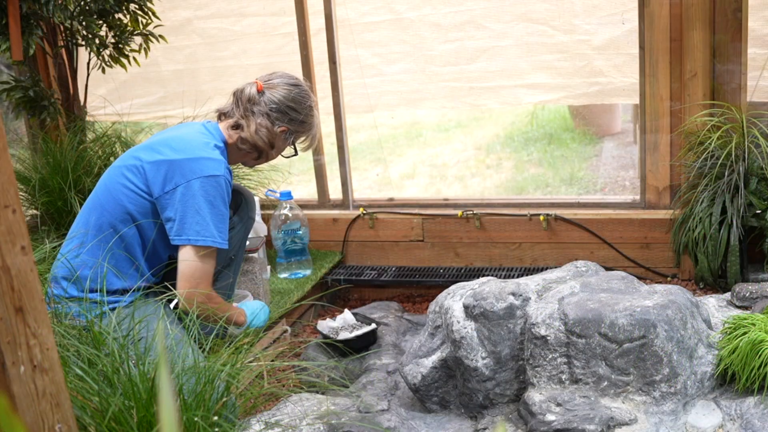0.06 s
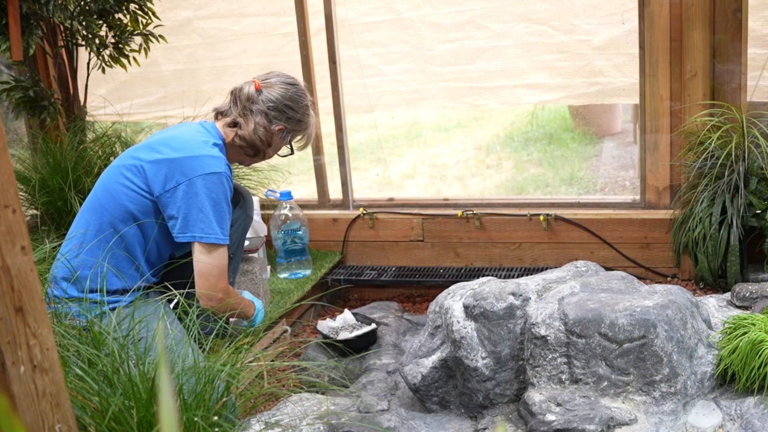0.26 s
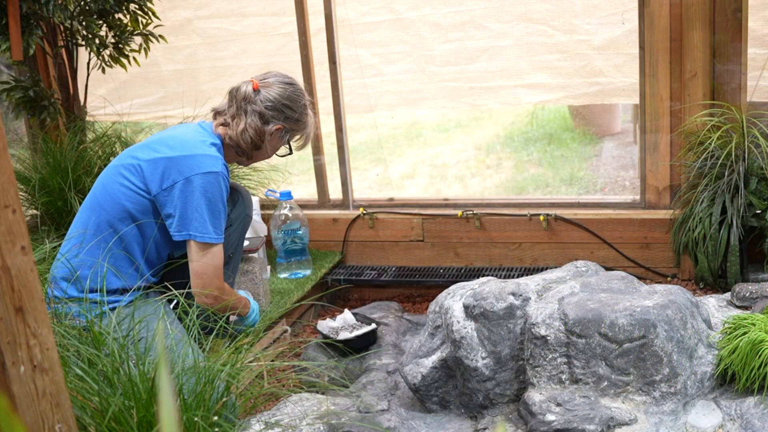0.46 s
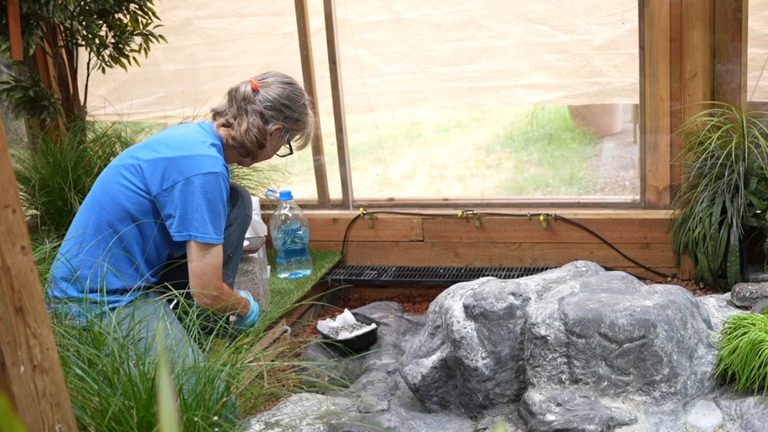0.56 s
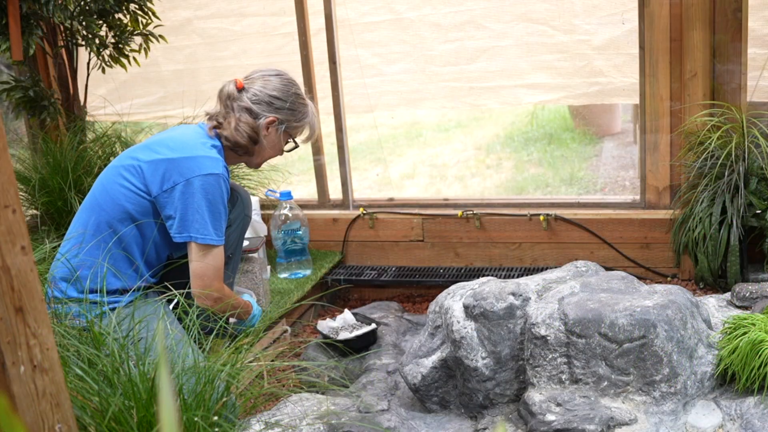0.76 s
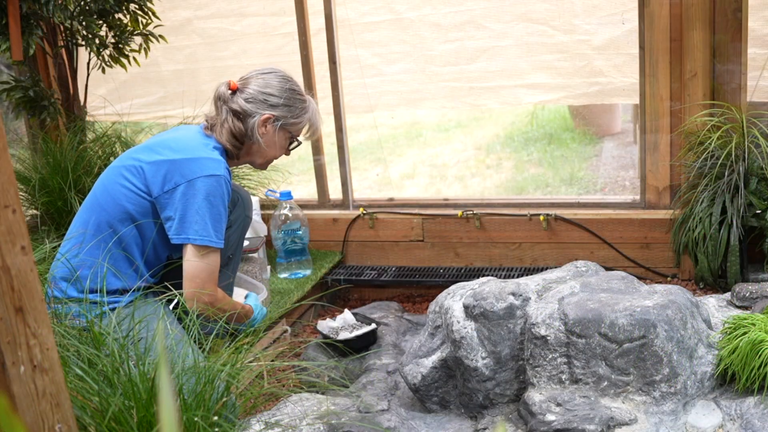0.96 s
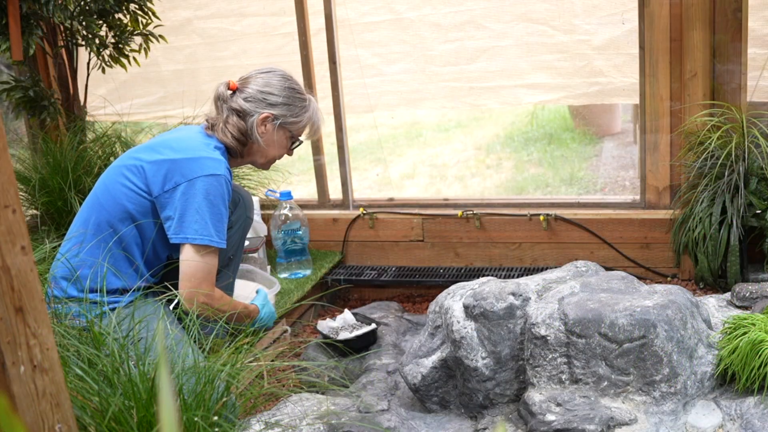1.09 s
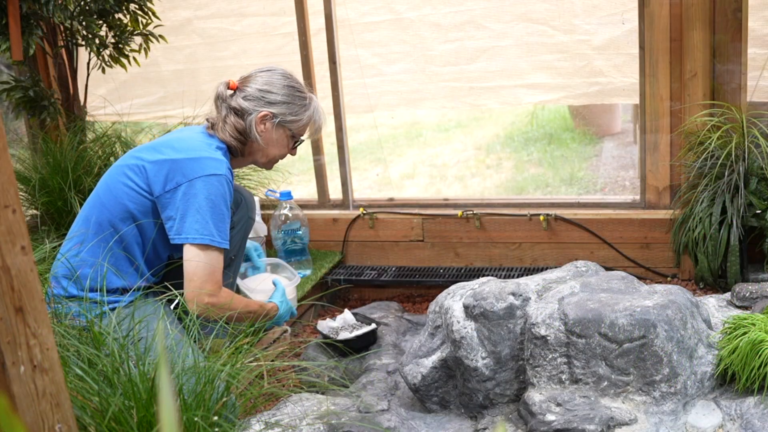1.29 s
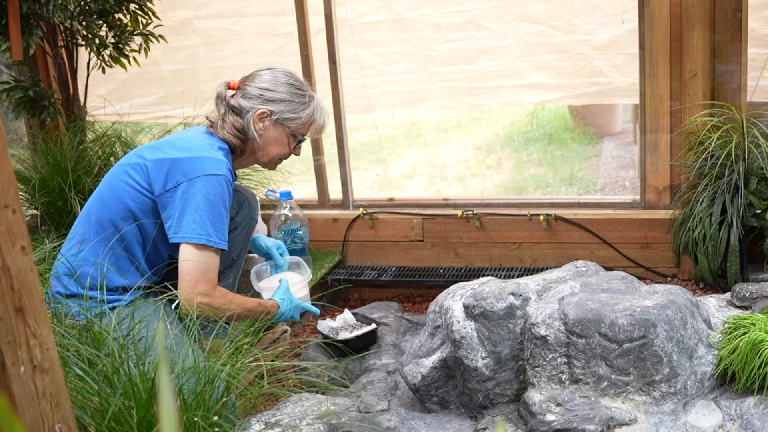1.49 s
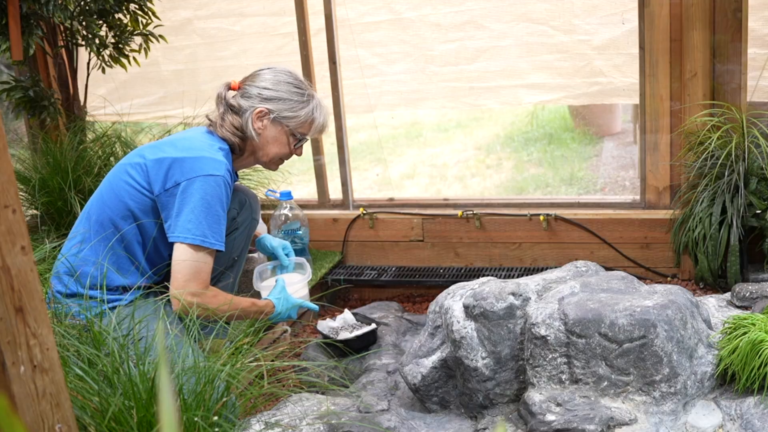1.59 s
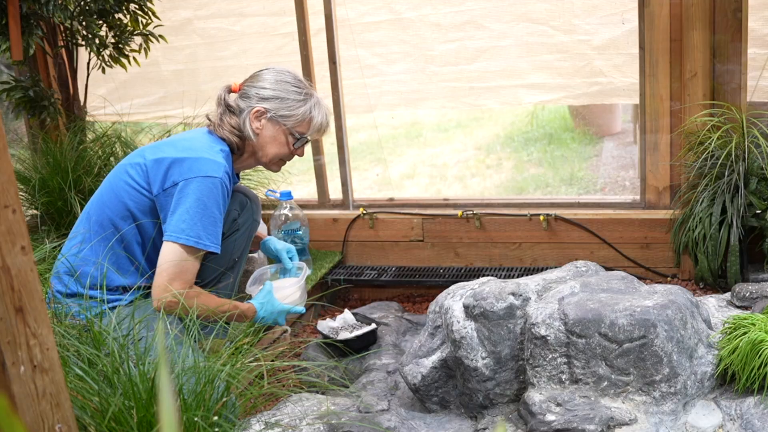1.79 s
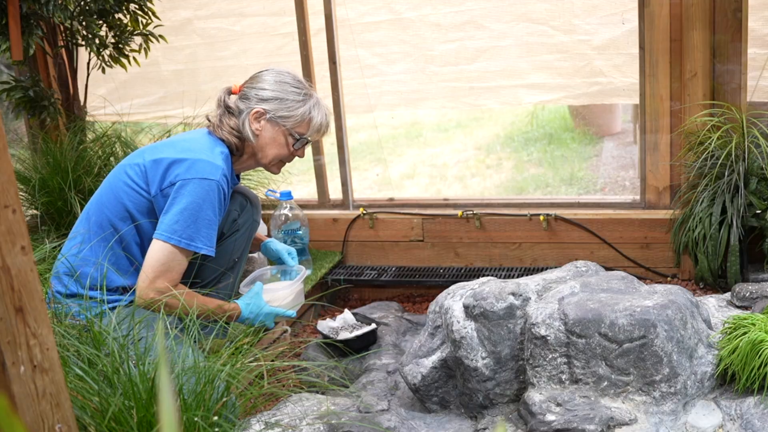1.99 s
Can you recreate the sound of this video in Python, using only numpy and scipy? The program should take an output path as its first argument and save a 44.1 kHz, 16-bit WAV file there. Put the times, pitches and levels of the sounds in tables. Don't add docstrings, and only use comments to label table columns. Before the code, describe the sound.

Small finches give three quick high whistled chirps, then one later, mostly as room echo; a plastic tub thuds and drags, followed by soft seed and glove rustle over a faint fan hum, in distant stereo.

```python
import sys
import numpy as np
from scipy import signal
from scipy.fft import rfft, irfft, next_fast_len
from scipy.io import wavfile
from scipy.ndimage import uniform_filter1d, map_coordinates

SR = 44100
rng = np.random.default_rng(int(sys.argv[2]) if len(sys.argv) > 2 else 0)


def field_ratio(decibels):
    return 10 ** (np.asarray(decibels, dtype=float) / 20)


def store_pcm(level_fs):
    pcm = np.round(np.clip(level_fs, -1, 1) * 32767).astype(np.int16)
    wavfile.write(sys.argv[1], SR, np.atleast_2d(pcm).T)


N = 90404
T = np.arange(N) / SR


def unit(x):
    return x / np.sqrt(np.mean(x ** 2) + 1e-20)


def along(points, hz):
    f, value = np.transpose(points)
    return np.interp(np.log(hz + 1), np.log(f + 1), value)


def wobble(rate):
    knots = rng.standard_normal(int(N * rate / SR) + 4)
    return map_coordinates(knots, [T * rate])


def filtered(x, response):
    size = next_fast_len(N + SR // 2)
    spectrum = rfft(x, size) * response(np.fft.rfftfreq(size, 1 / SR))
    return irfft(spectrum, size)[..., :N]


def rush(gain):
    # frequency in Hz, left-right likeness (1 = mono).
    likeness = [(60, .97), (180, .92), (400, .9), (750, .72), (1400, .45), (2800, .05), (15000, .05)]

    def mid_side(hz):
        angle = np.arccos(np.clip(along(likeness, hz), -1, 1)) / 2
        return gain(hz) * np.array([np.cos(angle), np.sin(angle)])

    mid, side = filtered(rng.standard_normal((2, N)), mid_side)
    return unit(np.array([mid + side, mid - side]))


def narrow(hz, width):
    return lambda f: 1 / (1 + ((f - hz) / width * 2) ** 2)


def bell(hz, octaves):
    return lambda f: np.exp(-(np.log2((f + 1) / hz) / octaves) ** 2 / 2)


def burst(start, rise, t60):
    age = np.maximum(T - start, 0)
    return (1 - np.exp(-age / rise)) * field_ratio(-60 * age / t60)


def swell(peak, rise, t60):
    before = np.exp(-((T - peak) / rise) ** 2 / 2)
    after = field_ratio(-60 * np.maximum(T - peak, 0) / t60)
    return np.where(T < peak, before, after)


def glide(rows):
    s, hz, db = np.transpose(rows)
    pitch = uniform_filter1d(np.interp(T, s, hz), size=133)
    sounding = (T > s[0]) * (T < s[-1])
    gain = uniform_filter1d(field_ratio(np.interp(T, s, db)) * sounding, size=67)
    return 2 * np.pi * np.cumsum(pitch) / SR, gain


def finches():
    # time in seconds, pitch in Hz, level in dB.
    chirps = [
        [(.187, 6300, -57), (.192, 6840, -47.5), (.201, 6954, -28), (.204, 6070, -38.5), (.208, 4260, -54)],
        [(.26, 5530, -66), (.272, 6185, -32.5), (.287, 6272, -37), (.298, 6600, -36), (.322, 6640, -32.5),
         (.335, 6130, -33.5), (.346, 4770, -59.5)],
        [(.452, 5070, -53), (.462, 5540, -36), (.472, 5740, -37.5), (.492, 6510, -30.5), (.508, 6570, -30.5),
         (.524, 6523, -34), (.532, 5920, -37), (.542, 5170, -55)],
        [(1.737, 7020, -54), (1.746, 6560, -38), (1.76, 6820, -41.5), (1.79, 7060, -33), (1.815, 7076, -41.5),
         (1.83, 6560, -34), (1.853, 5820, -50.5)],
    ]
    # octave overtone in dB, direct left over right in dB, direct level in dB.
    perches = [(-30, -9, -1.5), (-30.5, -8.5, 3), (-27.5, -13, -1.5), (-16, -11.5, -6.5)]
    out = np.zeros((2, N))
    for rows, (octave_db, pan_db, direct_db) in zip(chirps, perches):
        phase, gain = glide(rows)
        overtone = field_ratio(octave_db) * gain / gain.max() * np.sin(2 * phase)
        song = gain * (np.sin(phase) + overtone)
        sides_db = direct_db + np.array([[pan_db / 2], [-pan_db / 2]])
        out += field_ratio(sides_db) * song + field_ratio(9) * room(song)
    return out


def room(x):
    # frequency in Hz, reverberation time t60 in seconds.
    decay = [(200, 0.62), (2000, 0.9), (6500, 0.31), (14000, 0.19)]
    build_s, early_db, early_s = 0.0041, -5, 0.0083
    hz, t, z = signal.stft(rng.standard_normal((2, SR // 2)), SR, nperseg=256)
    fade = field_ratio(-60 * t / along(decay, hz)[:, None])
    tail = signal.istft(z * fade, SR, nperseg=256)[1]
    age = np.arange(tail.shape[1]) / SR
    tail = tail * (1 - np.exp(-age / build_s))
    tail = tail * (1 + field_ratio(early_db) * np.exp(-age / early_s))
    return signal.fftconvolve(np.atleast_2d(x), tail / np.linalg.norm(tail[0]), axes=1)[:, :N]


def bump():
    # frequency in Hz, level in dB per Hz.
    thud_colour = [(35, -40), (70, -12), (200, -4), (400, -4), (600, -8), (1100, -18), (2200, -28),
                   (3000, -60)]
    # start in seconds, mode in Hz, level in dB, t60 in seconds.
    hollow = [
        (.287, 195, -48, .15),
        (.3, 300, -43, .17),
        (.325, 85, -50, .2),
    ]
    rocking = field_ratio(-42 + 2 * wobble(58.7))
    out = rush(lambda hz: field_ratio(along(thud_colour, hz))) * rocking * burst(.287, 0.0013, .45)
    for s, hz, db, t60 in hollow:
        out += field_ratio(db + 5) * np.sin(2 * np.pi * hz * (T - s)) * burst(s, 0.0075, t60)
    return out


def drag():
    # time in seconds, effort in dB.
    pull = [(0.44, -67), (0.612, -51), (0.628, -54), (0.644, -49), (0.698, -44), (0.988, -70.5), (1.0, -63)]
    # frequency in Hz, level in dB per Hz.
    colour = [(350, -23.5), (600, -8.5), (1090, -4.5), (1250, -3), (1640, -3), (1780, 2.5), (3420, 1),
              (5360, -0.5), (15500, -18.5)]
    # time in seconds, pitch in Hz, level in dB.
    rim = [(.54, 3900, -63), (.58, 3700, -58), (.61, 3000, -58), (.64, 2600, -65)]
    # frequency in Hz, width in Hz, level in dB.
    wall = [(1543, 52, -47), (1865, 61, -47)]
    deep_hz, deep_lag_s, deep_db = 1400, 0.073, -11.5
    s, db = np.transpose(pull)

    def effort(lag):
        smooth_db = uniform_filter1d(np.interp(T - lag, s, db, left=-90, right=-90), size=600)
        return field_ratio(smooth_db + 4.5 + 0.55 * wobble(40))

    def low(hz):
        return 1 / (1 + (hz / deep_hz) ** 4)

    def bright_gain(hz):
        return field_ratio(along(colour, hz)) * (1 - low(hz))

    def deep_gain(hz):
        return field_ratio(along(colour, hz)) * low(hz) / (1 + (550 / (hz + 1)) ** 4)

    hiss = effort(0) * rush(bright_gain)
    deep = field_ratio(deep_db) * effort(deep_lag_s) * rush(deep_gain)
    phase, gain = glide(rim)
    squeak = gain * np.array([wobble(500) * np.sin(phase) + wobble(500) * np.cos(phase) for side in "LR"])
    ring = sum(field_ratio(db) * rush(narrow(hz, width)) for hz, width, db in wall)
    ring = ring * burst(0.638, 0.0042, 0.44)
    return hiss + deep + squeak + room(squeak) + ring


def rustles():
    # peak in seconds, level in dB, rise in seconds, t60 in seconds, centre in Hz.
    puffs = [(.49, -57.5, 0.03, 0.92, 790), (0.951, -55.5, 0.21, 0.65, 9030),
             (1.085, -54, 0.021, 0.67, 880), (1.07, -57, 0.027, 0.9, 5000),
             (1.168, -51.5, 0.011, 0.42, 6100), (1.359, -54.5, 0.03, 0.54, 9300),
             (1.54, -63.5, 0.031, 0.53, 7200), (1.831, -60, 0.0054, 0.16, 3940)]
    # start in seconds, level in dB, frequency in Hz, width in Hz, t60 in seconds.
    ticks = [(1.153, -53, 4800, 400, .1), (1.272, -64, 1950, 120, .6), (1.822, -66, 4100, 150, .2),
             (.47, -56, 870, 120, .8), (1.065, -66, 1100, 200, .2)]
    out = np.zeros((2, N))
    for s, db, rise, t60, hz in puffs:
        grain = field_ratio(db + 1.34 * wobble(160))
        out += grain * swell(s, rise, t60) * rush(bell(hz, 0.93))
    for s, db, hz, width, t60 in ticks:
        out += field_ratio(db) * burst(s, 0.0023, t60) * rush(narrow(hz, width))
    return out


def flutter():
    flutter_span = (.2, 0.69)
    on = (T > flutter_span[0]) * (T < flutter_span[1]) * 1.
    level = field_ratio(-59.5 + 1.36 * wobble(13))
    return level * uniform_filter1d(on, size=900) * rush(bell(11000, 0.37))


def fan():
    # frequency in Hz, level in dB per Hz.
    air_colour = [(13, -39), (22, -19.5), (124, -9.5), (159, -12), (308, -10.5), (416, -13.5), (783, -14.5),
                  (976, -20.5), (15700, -34.5)]
    # frequency in Hz, width in Hz, level in dB.
    hum = [(117.5, 19, -74.5), (227, 6.7, -80.5), (279.7, 18, -69), (311.65, 4.9, -65.5), (352.2, 5.5, -67),
           (383.7, 6.1, -70.5), (611, 11, -74), (764.8, 1.1, -62.5)]
    lines = sum(field_ratio(db + 0.99 * wobble(3.15)) * rush(narrow(hz, width)) for hz, width, db in hum)
    air = field_ratio(-59.5 + 0.2 * wobble(2.57)) * rush(lambda hz: field_ratio(along(air_colour, hz)))
    return air + lines


def scene():
    return finches() + bump() + drag() + rustles() + fan() + flutter()


def starved(x):
    # frequency in Hz, threshold in dB relative to the loudest treble band.
    mask = [(7200, -21), (8000, -25), (9500, -31), (11500, -37), (13000, -44), (14200, -45), (14700, -32),
            (15700, -30)]
    hz, t, z = signal.stft(x, SR, nperseg=2048)
    band = uniform_filter1d((abs(z) ** 2).mean(0), size=20, axis=0)
    loudest = band[hz > 4000].max(0)
    loudest = np.sqrt(loudest * np.roll(loudest, 1))
    keep = band > loudest * field_ratio(2 * along(mask, hz))[:, None]
    below_mask = (hz < mask[0][0])[:, None]
    return signal.istft(z * (keep | below_mask), SR, nperseg=2048)[1][:, :N]


def roll_off(x):
    return signal.sosfilt(signal.butter(12, 15810, fs=SR, output="sos"), x)


def record(dry):
    mix = starved(dry)
    return roll_off(mix)


dry = scene()
out = record(dry)
store_pcm(out)
```